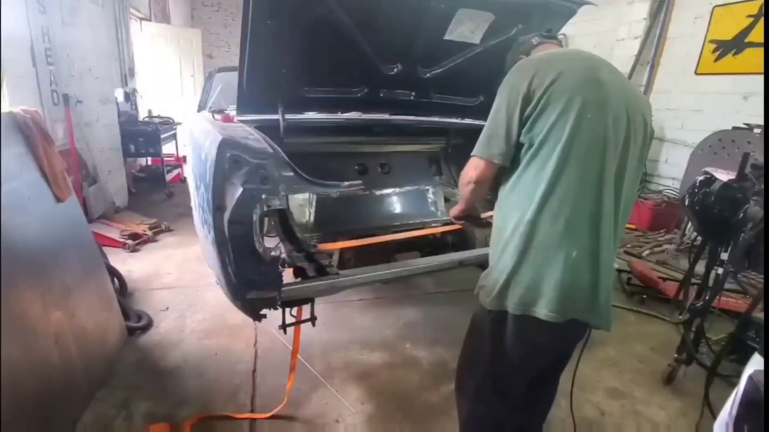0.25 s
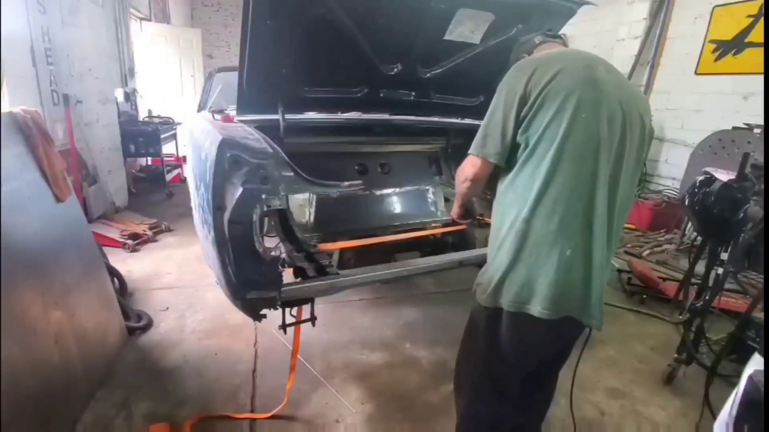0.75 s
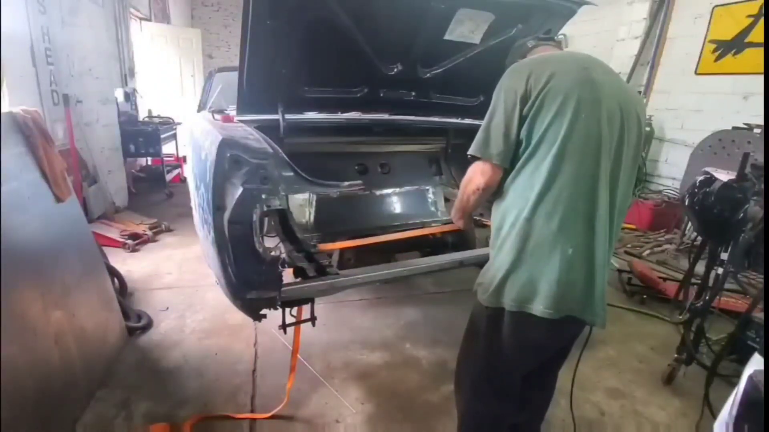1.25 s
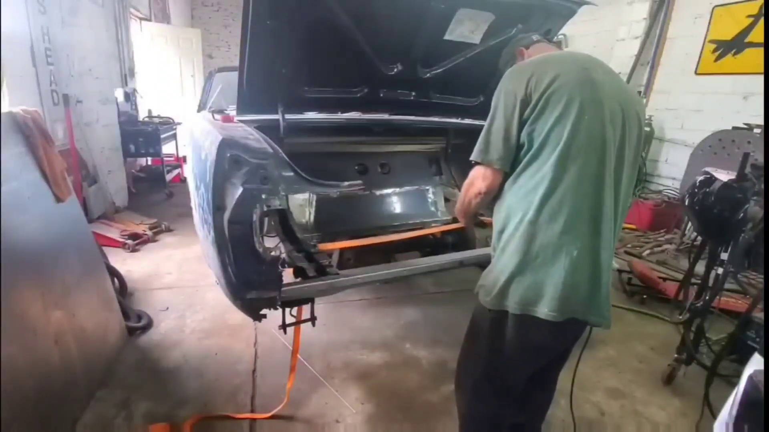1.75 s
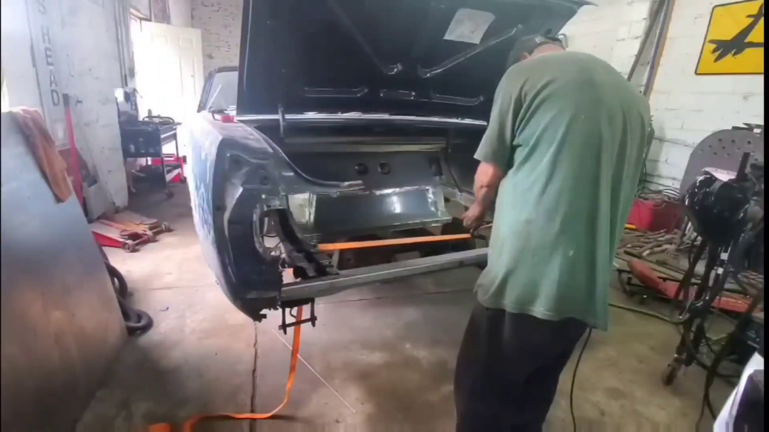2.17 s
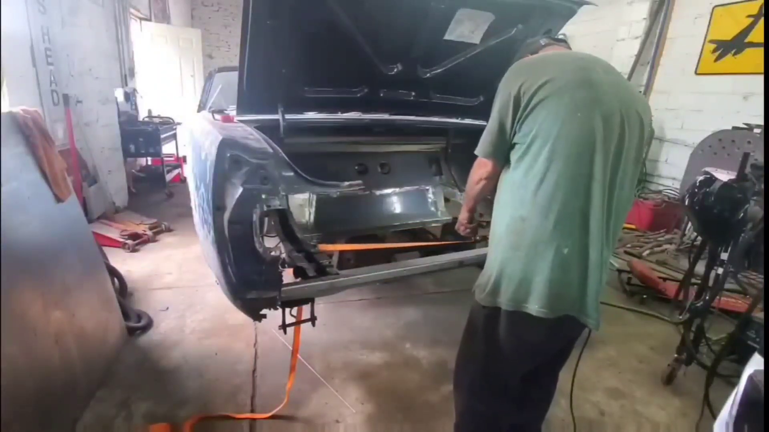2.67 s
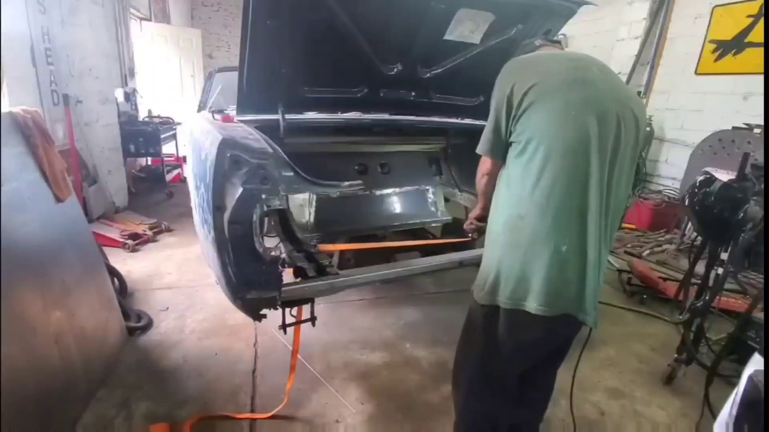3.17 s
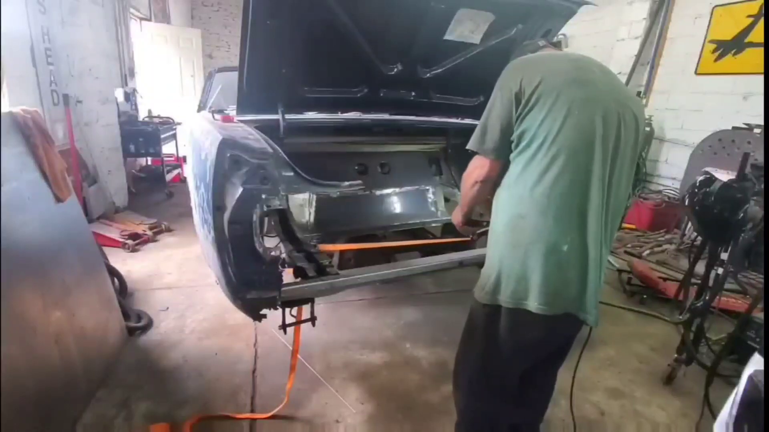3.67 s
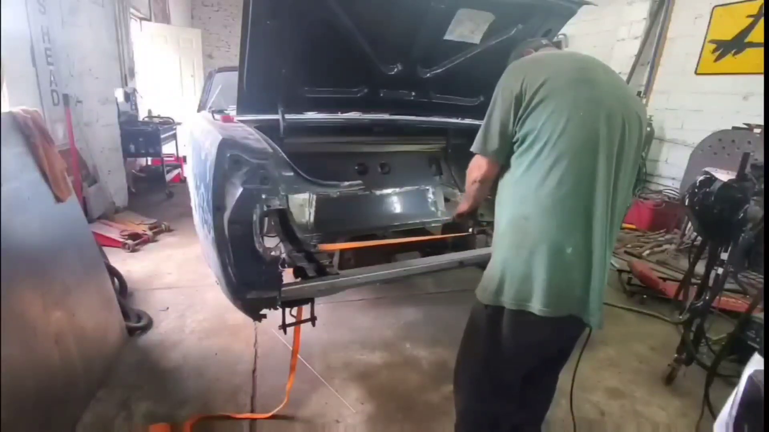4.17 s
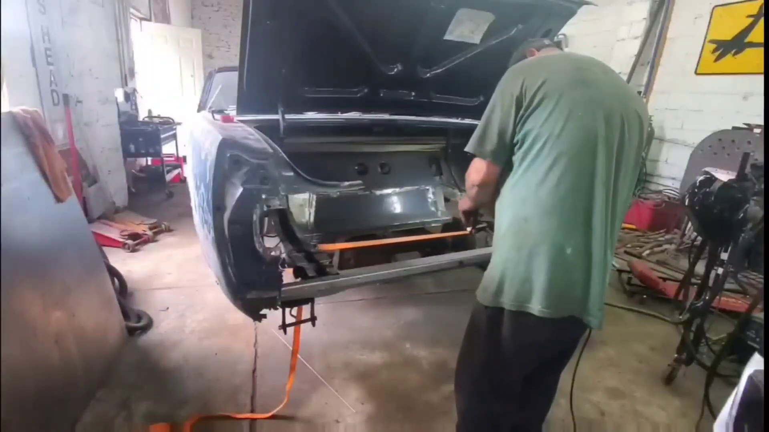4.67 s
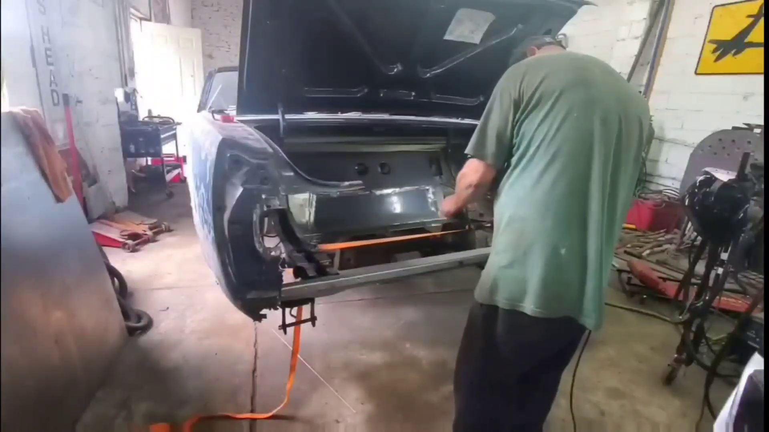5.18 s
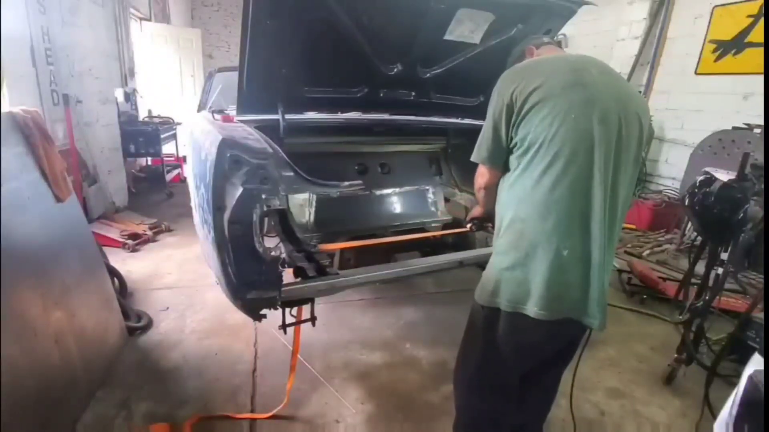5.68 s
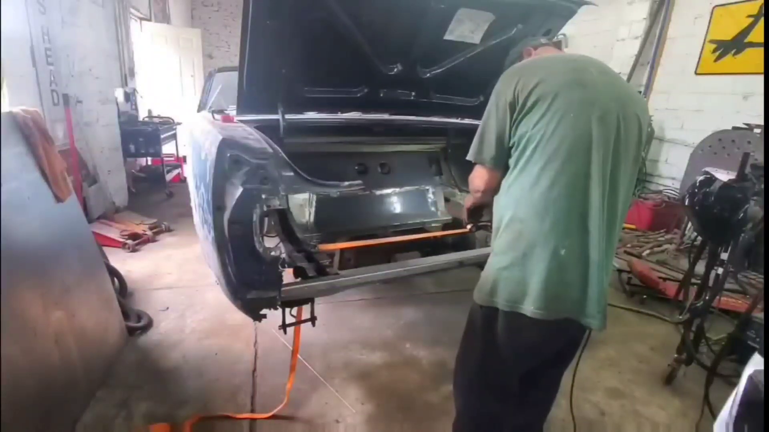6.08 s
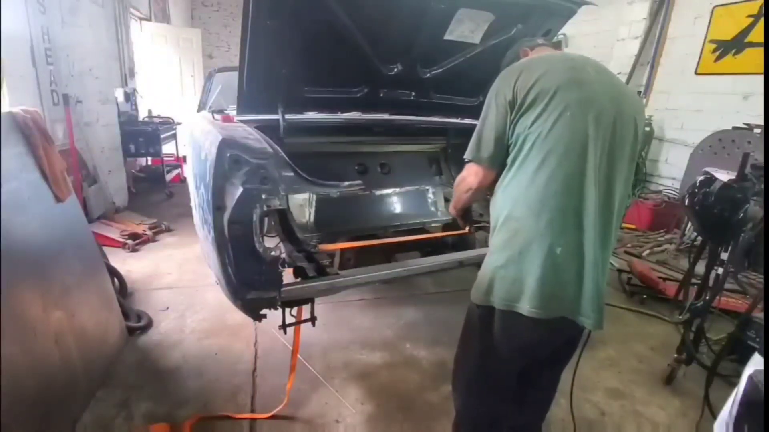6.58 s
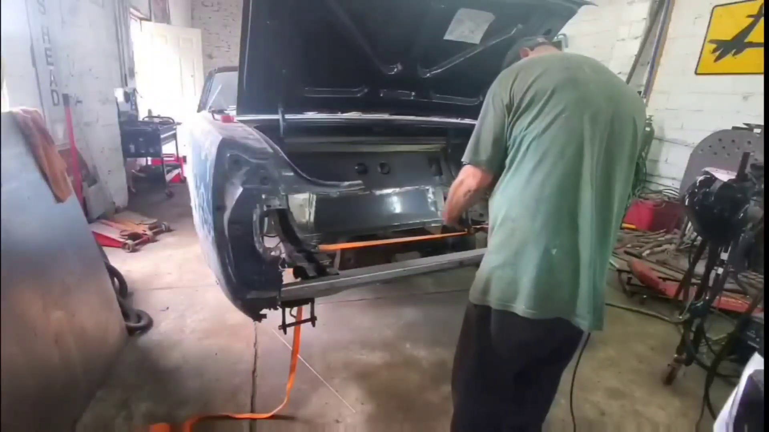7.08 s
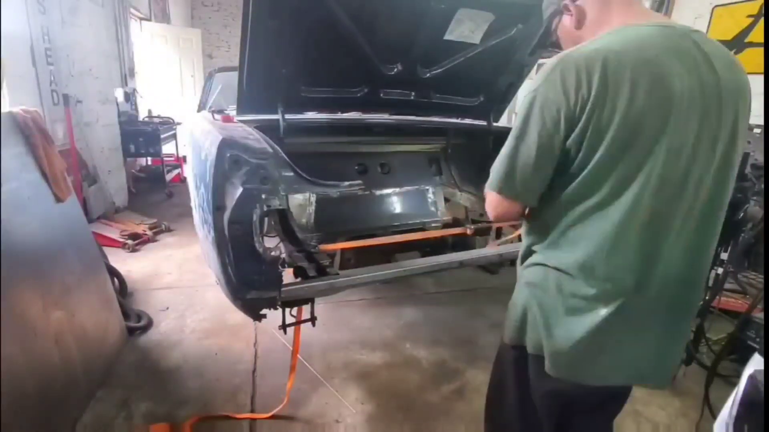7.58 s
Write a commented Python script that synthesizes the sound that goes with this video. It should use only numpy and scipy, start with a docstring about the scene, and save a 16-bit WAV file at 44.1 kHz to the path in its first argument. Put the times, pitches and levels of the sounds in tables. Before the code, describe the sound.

Metallic ratchet clicks and loose handle rattles, sparse at first then quick and loud, with creaking webbing and dull car-body knocks over low hum.

```python
"""A ratchet strap is cranked tight across a car's bare body in a workshop, a few steps away.
Its pawl snaps over the teeth in uneven bursts: shaped noise for the chatter, decaying sines for the steel.
Each snap or bump shakes the sheet metal and the hollow body: resonant noise, with sines for the panels.
The webbing creaks on its spool in bursts of resonant noise, and the room answers each sound briefly.
Behind it a motor hums in wavering sines, over a low rumble and a thin, high hiss of filtered noise."""
import sys
import numpy as np
from scipy import signal
from scipy.fft import rfft, irfft, next_fast_len
from scipy.io import wavfile
from scipy.ndimage import map_coordinates

SR = 44100
rng = np.random.default_rng(int(sys.argv[2]) if len(sys.argv) > 2 else 0)


def wav_out(sig):
    """Save sig, one row per channel (or a flat mono array), as 16-bit PCM at SR to the path in sys.argv[1]."""
    wavfile.write(sys.argv[1], SR, np.round(np.clip(np.atleast_2d(sig).T, -1, 1) * 32767).astype(np.int16))


N = 345732


def amp(db):
    """Decibels to gain."""
    return 10 ** (np.asarray(db) / 20)


def unit(x):
    """Scale to rms 1."""
    return x / np.sqrt(np.mean(x ** 2) + 1e-20)


def along(points, hz):
    """Read a curve of (frequency, value) points on a log frequency axis."""
    f, v = np.transpose(points)
    return np.interp(np.log(hz + 1), np.log(f + 1), v)


def bump(hz, centre_hz, width, db):
    """A hump in dB around one frequency; width is a share of that frequency."""
    return db / (1 + ((hz / centre_hz - 1) / width) ** 2)


def resonances(modes, hz):
    """Gain of a set of steep resonances, their powers summed."""
    power = 0
    for centre, width, db in modes:
        response = np.abs(hz * width / (centre * centre - hz * hz + 1j * hz * width))
        power = power + amp(db) ** 2 * response ** 3
    return np.sqrt(power)


def wobble(rate):
    """A smooth random curve, rate knots a second."""
    knots = rng.standard_normal(1024)
    return map_coordinates(knots, [np.arange(N) * rate / SR], mode="wrap")


# left-right likeness of the noise: (f/Hz, correlation)
LIKENESS = [(100, 0.9), (250, 0.93), (500, 0.64), (1000, 0.13), (3000, 0.025), (12000, 0.06)]


def noise(gain, size):
    """Stereo noise of rms 1 with a given colour; the two sides agree mostly in the bass."""
    hz = np.fft.rfftfreq(size, 1 / SR)
    turn = np.arccos(np.clip(along(LIKENESS, hz), -1, 1)) / 2
    spectra = rfft(rng.standard_normal((2, size))) * gain(hz)
    mid, side = irfft(spectra * [np.cos(turn), np.sin(turn)], size)
    return unit(np.array([mid + side, mid - side]))


def add(track, s, sound):
    """Mix a sound in at time s, trimmed to the track."""
    start = round(s * SR)
    sound = sound[:, max(-start, 0):]
    stretch = track[:, max(start, 0):][:, :sound.shape[1]]
    stretch += sound[:, :stretch.shape[1]]


# reverb time of the workshop's early decay: (f/Hz, t60/s)
WORKSHOP = [(150, 0.58), (600, 0.46), (2000, 0.32), (5000, 0.33), (9000, 0.24), (15000, 0.23)]


def in_room(sound, wet_db, build):
    """Add the workshop's answer: near walls die soonest in the treble, the far end lingers faintly."""
    hz, t, z = signal.stft(noise(np.ones_like, size=SR // 2), SR, nperseg=256)
    near_db = -60 * t / along(WORKSHOP, hz)[:, None]
    far_db = -13.5 + 0.55 * near_db
    decay = np.hypot(amp(near_db), amp(far_db))
    onset = 1 - np.exp(-t / build)
    response = signal.istft(z * decay * onset, SR, nperseg=256)[1]
    response *= amp(wet_db) / np.linalg.norm(response[0])
    response[:, 0] += 1  # the direct sound
    return signal.fftconvolve(sound, response, axes=1)


def chatter(t, length, t60, scatter_db, slide, count):
    """Envelope of energy 1 ms: a slide swelling around time 0, a strike, and random rebounds within length."""
    rebounds = (np.arange(count) + rng.random(count)) / count
    starts = length * np.append(0, rebounds)
    sizes = amp(scatter_db * rng.standard_normal(count + 1))
    age = t - starts[:, None]
    power = sizes ** 2 @ ((age >= 0) * amp(-60 * np.abs(age) / t60) ** 2)
    rise, slide_db = slide
    power += amp(slide_db) ** 2 * np.exp(-np.abs(t) / rise)
    return np.sqrt(power / power.sum() * SR / 1000)


# colour of the high hiss: (f/Hz, relative level/dB per Hz)
HISS_COLOUR = [(3000, -28.5), (5900, -27), (6400, -2.5), (7100, -2.5), (7650, -9), (8100, -24.5),
               (16000, -23.5)]


def hiss():
    """A narrow high band of noise whose level flutters slightly."""
    return noise(lambda hz: amp(along(HISS_COLOUR, hz)), size=N) * amp(-70 + .4 * wobble(48))


# colour of the hall's rumble: (f/Hz, relative level/dB per Hz)
RUMBLE_COLOUR = [(13, -62.5), (22, -29), (40, -11.5), (64, -3.5), (90, -5.5), (127, -10), (146, -18),
                 (212, -9.5), (267, -21), (306, -19), (475, -26.5), (559, -30.5), (599, -32.5),
                 (972, -41.5), (5500, -46), (7150, -48.5), (12100, -120)]
# how loud the rumble runs: (t/s, level/dB)
RUMBLE_LEVEL = [(0, -60), (3.55, -58), (3.85, -55), (4.1, -57), (4.5, -58.5), (5.8, -54.5), (6.25, -60.5),
                (7.2, -59.5), (7.84, -55.5)]


def rumble():
    """Bass-heavy noise of the hall, riding a level curve."""
    level_db = np.interp(np.arange(N) / SR, *np.transpose(RUMBLE_LEVEL))
    return noise(lambda hz: amp(along(RUMBLE_COLOUR, hz)), size=N) * amp(level_db)


# lines of the motor's hum: (f/Hz, level/dB); the first row lends only its frequency
HUM_LINES = [(59.2, -59), (118.4, -64.5), (209.9, -70.5), (312.2, -78.5), (393.0, -81)]
# swell and fade of the lowest hum line: (t/s, level/dB), before a slight random wobble
LOWEST_LINE_LEVEL = [(0.0, -76), (0.06, -65), (0.33, -54), (0.78, -72), (1.07, -57.5), (2.95, -57.5),
                     (3.1, -72), (3.91, -54.5), (4.08, -71), (4.69, -69), (5.24, -77), (5.65, -55),
                     (6.05, -61), (6.77, -54.5), (7.75, -58.5), (7.84, -73)]


def hum():
    """A motor's sine lines with wandering phase: the lowest swells and fades under steadier overtones."""
    t = np.arange(N) / SR
    line = lambda hz: np.sin(2 * np.pi * hz * t + .5 * wobble(3))
    (lowest_hz, _), *overtones = HUM_LINES
    lowest_db = np.interp(t, *np.transpose(LOWEST_LINE_LEVEL)) + 0.41 * wobble(18)
    out = unit(line(lowest_hz)) * amp(lowest_db)
    for hz, db in overtones:
        out = out + amp(db + 3 + 1.5 * wobble(2.9)) * line(hz)  # +3 dB: rms level to sine peak
    return out


def background():
    """The steady bed: motor hum, hall rumble and hiss."""
    return hum() + rumble() + hiss()


# slips of the webbing on its spool: (t/s, level/dB, pitch f/Hz)
CREAKS = [(0.048, -62.5, 2280), (0.298, -49.5, 2180), (0.52, -59, 1500), (0.698, -61, 2200),
          (1.04, -48.5, 3020), (1.569, -56.5, 1360), (2.959, -62, 1740), (3.53, -56, 2640),
          (3.586, -39.5, 2480), (4.134, -42.5, 2640), (4.275, -23.5, 1830), (4.315, -27.5, 2150),
          (5.45, -28.5, 1770), (5.531, -32.5, 1860), (5.78, -45.5, 1850), (7.008, -45, 1490),
          (7.045, -48, 2900)]
SLIP_S = .023  # length of a slip
# the strap creeps this long before a slip, softer, and never above a ceiling
CREEP_S, CREEP_UNDER_DB, CREEP_MAX_DB = 0.064, 15.5, -39


def slips():
    """A soft creep leads into every slip: (t/s, level/dB, pitch f/Hz, length/s)."""
    for s, db, pitch_hz in CREAKS:
        yield s - CREEP_S, min(db - CREEP_UNDER_DB, CREEP_MAX_DB), pitch_hz, CREEP_S
        yield s, db, pitch_hz, SLIP_S


# resonances of the spool: (f/Hz, width/Hz, relative level/dB)
SPOOL = [(1412, 110, 1), (1740, 166, 1), (1910, 150, 2), (2440, 100, -16), (2680, 1500, 0),
         (6000, 13000, -11)]


def webbing():
    """The strap creeps, then slips in a quick run of tiny catches; a longer slip dies away more slowly."""
    out, t = np.zeros((2, N)), np.arange(-2048, 6144) / SR
    for s, db, pitch_hz, length in slips():
        catches = chatter(t, length, t60=2 * length, scatter_db=5.0, slide=(.006, -10), count=6)
        colour = lambda hz: resonances(SPOOL, hz) * amp(bump(hz, pitch_hz, width=0.13, db=11))
        creak = noise(colour, size=len(t)) * catches
        add(out, s + t[0], amp(db) * in_room(creak, wet_db=2.0, build=0.0052))
    return out * amp([[.6], [-.6]])  # slightly to the left


# bumps of the ratchet against the car body: (t/s, panel level/dB, boom level/dB, panel pitch f/Hz)
KNOCKS = [(0.497, -56.5, -77, 890), (0.954, -65, -76, 510), (5.6, -40, -47, 576), (5.864, -53, -53, 768),
          (6.446, -44.5, -48, 870), (6.997, -41, -56.5, 890), (7.143, -31, -49, 687),
          (7.413, -59, -54, 650), (7.631, -62.5, -53.5, 810)]
BODY_DELAY_S = 0.006076  # from a snap until the car body answers
PANEL_HZ, BOOM_HZ = 997, 198  # where a snap excites the panels most, and a bump the hollow body


def blows():
    """Bumps and delayed snaps: (t/s, panel level/dB, boom level/dB, panel pitch f/Hz, boom pitch f/Hz)."""
    for s, *_, panel_db, boom_db, boom_hz in SNAPS:
        yield s + BODY_DELAY_S, panel_db, boom_db, PANEL_HZ, boom_hz
    for knock in KNOCKS:
        yield (*knock, BOOM_HZ)


# resonances of the sheet metal: (f/Hz, width/Hz, relative level/dB)
PANEL = [(551.4, 28, 1.5), (603, 16, 2), (625, 52, -4), (802.5, 47, -1), (922, 220, -3.5), (1030, 17, 2.5),
         (1241, 200, 2.5), (1670, 300, -8.5)]
# resonances of the hollow body: (f/Hz, width/Hz, relative level/dB)
BOOM = [(159, 38, 6), (215, 20, -0.5), (266, 310, 3), (350, 26, -9)]


def car_body():
    """A blow makes the panels clang first, then the hollow body boom; each blow favours its own pitches."""
    out, t = np.zeros((2, N)), np.arange(16384) / SR
    mode_hz, _, mode_db = np.transpose(PANEL)[:, :, None]

    def swell(rise, t60):
        """Build up over rise, then die away."""
        return (1 - np.exp(-t / rise)) * amp(-60 * t / t60)

    def ringing(modes, pitch_hz):
        """Noise through the resonances, stressed around one pitch."""
        colour = lambda hz: resonances(modes, hz) * amp(bump(hz, pitch_hz, width=0.12, db=9))
        return noise(colour, size=len(t))

    for s, panel_db, boom_db, panel_hz, boom_hz in blows():
        clang = swell(.004, 0.22) * ringing(PANEL, panel_hz)
        # the lowest panel modes sing on longest
        swing = np.sin(2 * np.pi * (mode_hz * t + rng.random(mode_hz.shape)))
        singing = (amp(mode_db) * swing * swell(0.0064, 190 / mode_hz)).sum(axis=0)
        clang = clang + amp(-17.5) * singing
        boom = swell(0.022, 0.29) * ringing(BOOM, boom_hz)
        panned_clang = clang * amp([[1.3], [-1.3]])
        body = amp(panel_db - 4.0) * panned_clang + amp(boom_db + 5) * boom
        add(out, s, in_room(body, wet_db=-8.0, build=0.00644))
    return out


# the pawl rides up a tooth and snaps over it, shaking the car body:
# (t/s, level/dB, chatter length/s, ride length/s, ride level/dB, clank/dB, brightness/dB,
#  main resonance f/Hz, panel level/dB, boom level/dB, boom pitch f/Hz)
SNAPS = [(1.834, -23.5, 0.0059, 0.012, -36, -16, -4.5, 14000, -79, -58.5, 248),
         (3.6, -30.5, 0.0078, 0.019, -42.5, -10.5, -6.5, 2430, -59.5, -57.5, 196),
         (3.727, -12.5, 0.0049, 0.0028, -19.5, -13, 1.5, 6700, -41.5, -41, 158),
         (3.842, -12, .010, 0.0011, -26.5, -10, -1.5, 6860, -46.5, -48, 179),
         (4.279, -10.5, .008, .006, -20, -10, 2, 2750, -46, -56, 180),
         (4.346, -11, 0.0052, 0.00076, -26.5, -6, 4.5, 9630, -37.5, -49, 277),
         (4.606, -23.5, 0.0072, 0.027, -30.5, -8.5, 0, 2260, -49, -56.5, 239),
         (4.823, -11.5, 0.0053, 0.01, -25.5, -10.5, 5, 7140, -39, -46.5, 184),
         (5.060, -14, 0.012, 0.0075, -18, -15, 4, 4230, -39, -43, 187),
         (5.482, -12, 0.0065, 0.038, -35, -9, 4.5, 6000, -39.5, -45, 183),
         (5.572, -10, .004, 0.0019, -18, -12, 1, 11120, -40, -42, 155),
         (6.462, -20.5, 0.0081, .024, -18.5, -15.5, -0.5, 4290, -37.5, -41.5, 267),
         (7.106, -21.5, 0.0043, 0.019, -26.5, -13.5, -0.5, 4560, -42.5, -51, 246)]
RIDE_SHARE = .8  # the pawl scrapes for this share of its ride, then falls free
# ticks of the loose handle as it is swung: (t/s, level/dB, clank/dB, brightness/dB)
TICKS = [(0.3, -43.5, -16, 3), (0.368, -40, -9.5, 2.5), (1.022, -37.5, -9.5, -12), (1.257, -50.5, -14, -9),
         (1.319, -47, -23, -11), (2.643, -44.5, -15.5, -2), (2.742, -47, -23, -1), (2.774, -47, -16, -10),
         (3.218, -40.5, -13.5, -5), (3.31, -48, -13, -18), (3.554, -45.5, -10, -10.5),
         (4.113, -36, -7.5, -6), (4.147, -33, -1.5, -10), (4.631, -28, -2, -3.5), (5.219, -33.5, -9.5, -2),
         (5.856, -33.5, -7.5, -10.5), (5.918, -37, -20, -2.5), (7.003, -40, 3, -7.5),
         (7.131, -23, -12.5, -5), (7.144, -26.5, -6, -8), (7.406, -44, -25.5, -4.5),
         (7.634, -41.5, -8.5, -8.5)]
TICK_HZ, TICK_CHATTER_S = 2560, .008  # main resonance and chatter length of every tick


def contacts():
    """Steel hits: (t/s, level/dB, clank/dB, brightness/dB, main resonance f/Hz, chatter length/s)."""
    for s, db, length, ride_s, ride_db, clank_db, bright_db, main_hz, *_ in SNAPS:
        yield s - ride_s, ride_db, clank_db, bright_db, main_hz, RIDE_SHARE * ride_s
        yield s, db, clank_db, bright_db, main_hz, length
    for tick in TICKS:
        yield (*tick, TICK_HZ, TICK_CHATTER_S)


# colour of a steel contact: (f/Hz, relative level/dB per Hz)
STEEL = [(500, -22), (1000, -25), (1400, 7.5), (1800, 11), (2700, 12), (3600, 4.5), (5500, 1), (7000, 3.5),
         (9000, 0.5), (12000, 1), (16000, -3)]
# ringing modes of the ratchet's frame: (f/Hz, relative level/dB, t60/s)
FRAME = [(1647, 10.5, 0.16), (1904, 4.5, 0.22), (2010, 7.5, 0.38), (2330, -2, 0.23), (2680, -6.5, 0.18),
         (2970, 9, 0.22), (3295, -1.5, 0.38), (3768, -20, 0.15), (3900, -10.5, .17), (5660, -10.5, 0.14),
         (6900, -12.5, 0.2), (6800, -6, 0.12), (8660, 3, .18), (10150, -1, 0.26), (10750, 2, .2),
         (12860, -11.5, .14), (14820, -6, .16)]


def ratchet():
    """The pawl rides up a tooth, drops, chatters and rings the steel frame at new strengths."""
    out, t = np.zeros((2, N)), np.arange(-1024, 7168) / SR
    mode_hz, mode_db, mode_t60 = np.transpose(FRAME)[:, :, None]
    for s, db, clank_db, bright_db, main_hz, length in contacts():
        tilt = [(2600, clank_db), (4000, 0.0053), (7500, 0.0034), (11000, bright_db)]
        # every blow lands on another spot: one resonance stands out, the others vary
        blow_db = lambda hz: along(tilt, hz) + bump(hz, main_hz, width=.06, db=5)
        spot = list(zip(np.geomspace(800, 16000, num=110), 1.8 * rng.standard_normal(110)))
        colour = lambda hz: amp(along(STEEL, hz) + blow_db(hz) + along(spot, hz))
        snap = chatter(t, length, t60=0.01, scatter_db=3.0, slide=(.0012, -12), count=4)
        # the loose handle rattles on for a moment
        rattle = chatter(t - .012, .04, t60=0.0058, scatter_db=-1, slide=(.001, -20), count=5)
        crack = noise(colour, size=len(t)) * np.hypot(snap, amp(-15.5) * rattle)
        # a little of each side reaches the other
        crack = crack + 0.052 * crack[::-1]
        scatter_db = 3.5 * rng.standard_normal((2, len(FRAME), 1))
        strength = amp(mode_db + blow_db(mode_hz) + scatter_db)
        swing = np.sin(2 * np.pi * (mode_hz * t + rng.random((2, len(FRAME), 1))))
        fade = amp(-60 * np.abs(t) / mode_t60)
        ring = (t >= 0) * (strength * swing * fade).sum(axis=1)
        hit = crack + amp(-40.5) * ring
        add(out, s + t[0], amp(db - 3.5) * in_room(hit, wet_db=1.5, build=0.001))
    return out * amp([[.5], [-.5]])  # slightly to the left


def scene():
    """Ratchet, strap and car body over the workshop's own noise."""
    return background() + webbing() + car_body() + ratchet()


TOP_HZ = 15900  # band limit


def record(dry):
    """Cut everything at and above the band limit."""
    size = next_fast_len(N + SR // 2)
    keep = np.fft.rfftfreq(size, 1 / SR) < TOP_HZ
    return irfft(rfft(dry, size) * keep, size)[:, :N]


dry = scene()
out = record(dry)
wav_out(out)
```